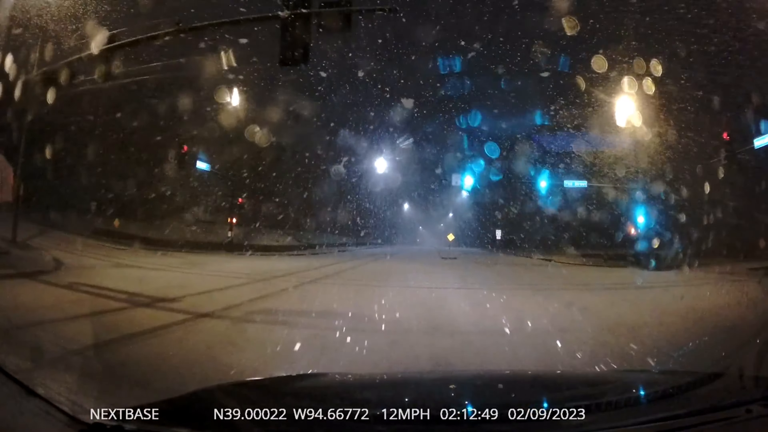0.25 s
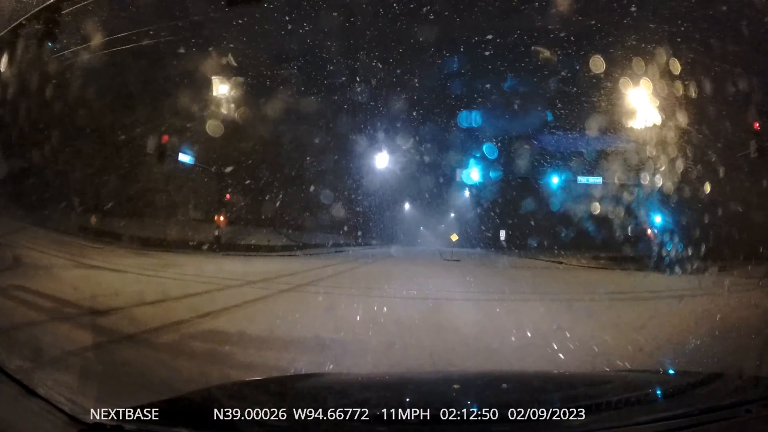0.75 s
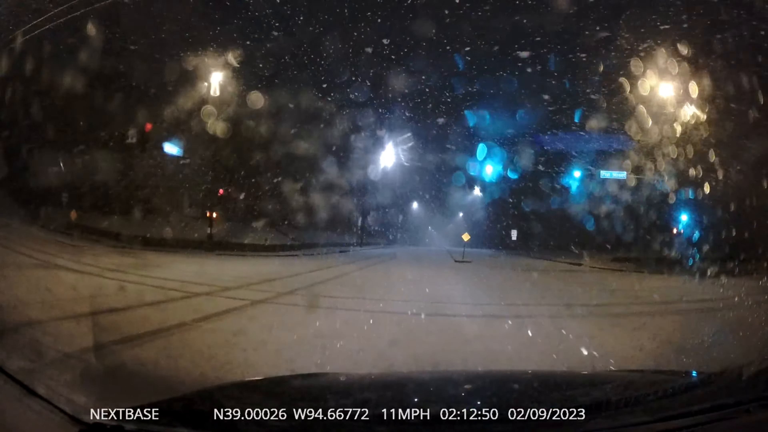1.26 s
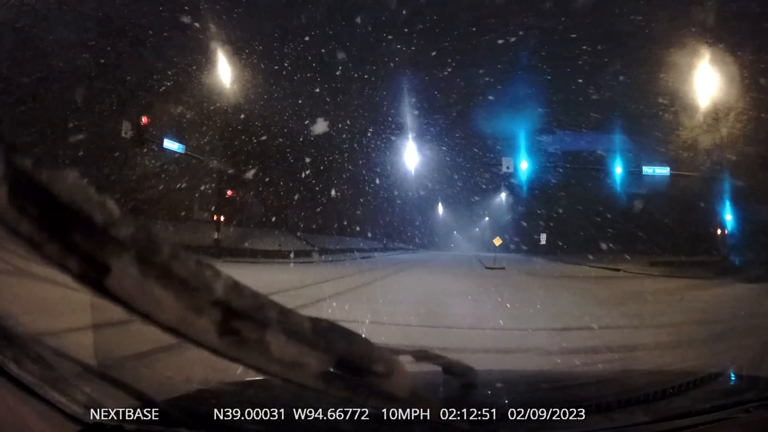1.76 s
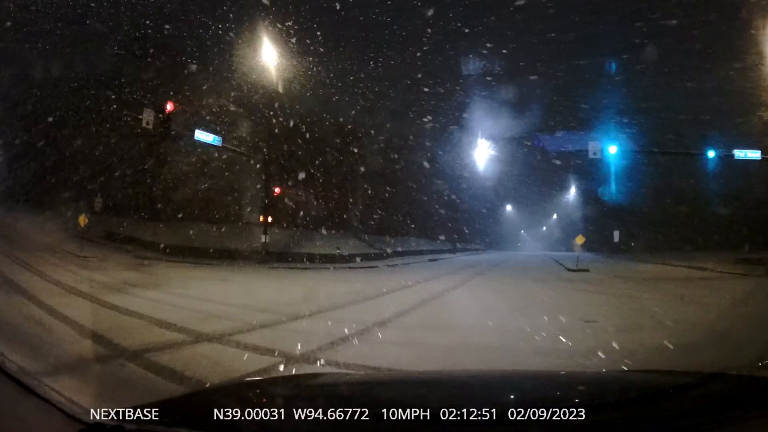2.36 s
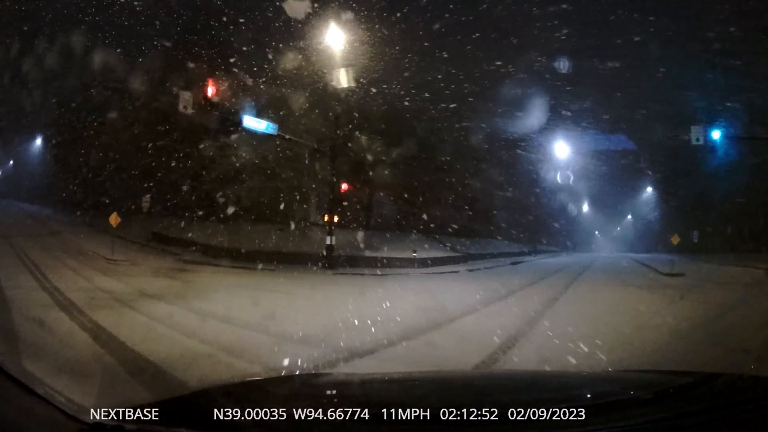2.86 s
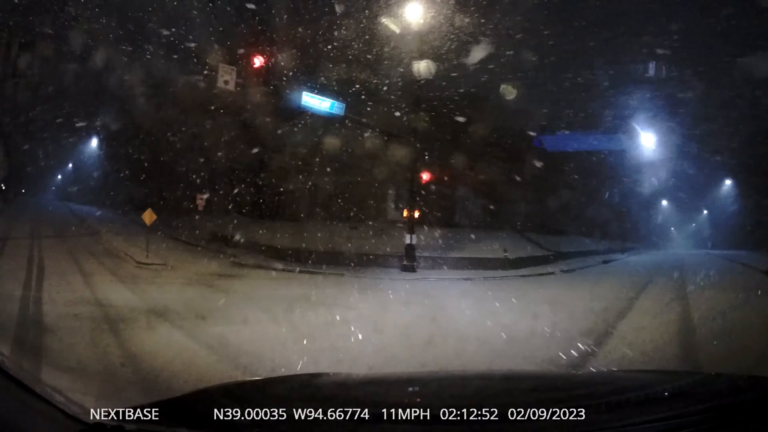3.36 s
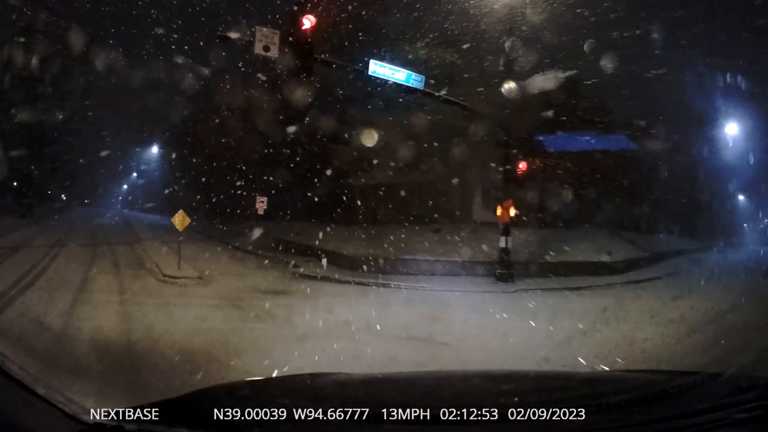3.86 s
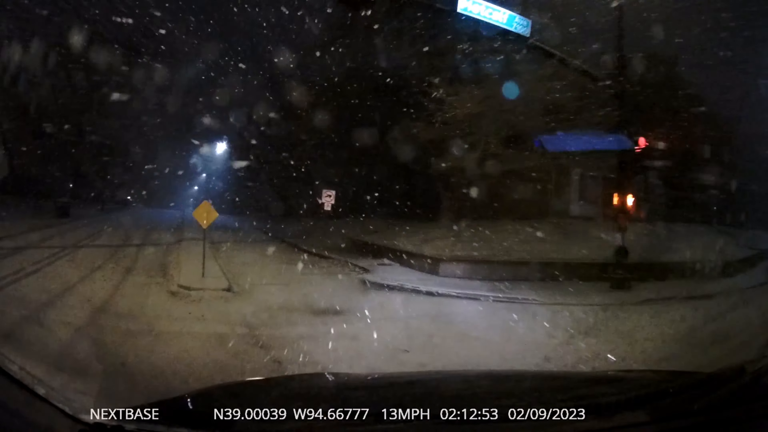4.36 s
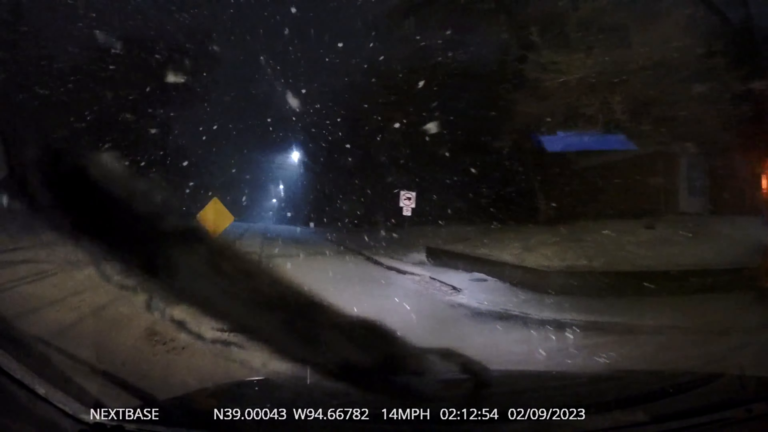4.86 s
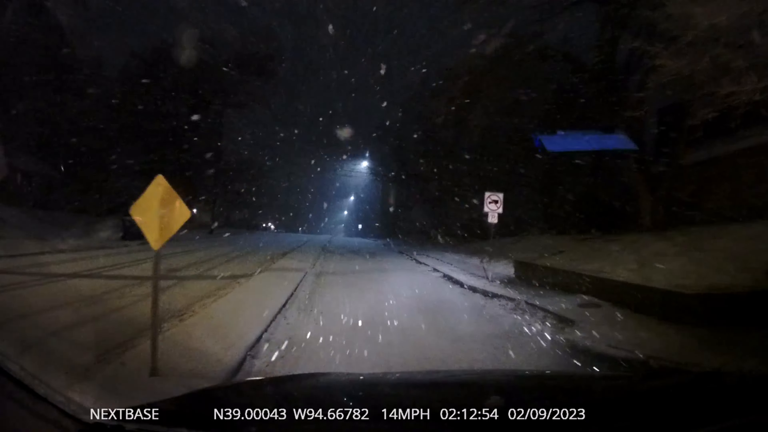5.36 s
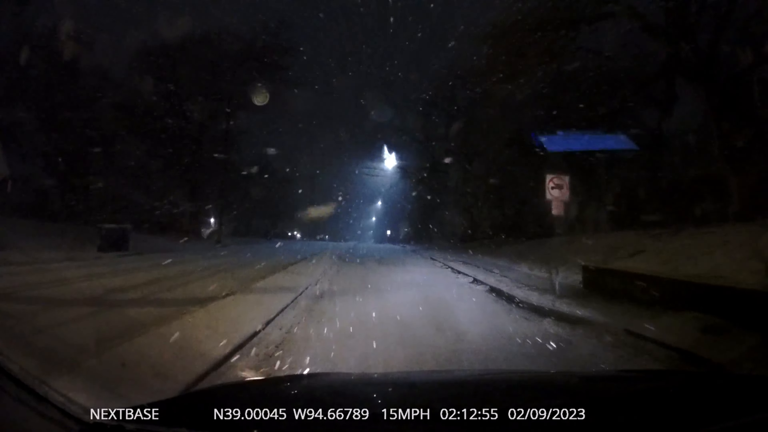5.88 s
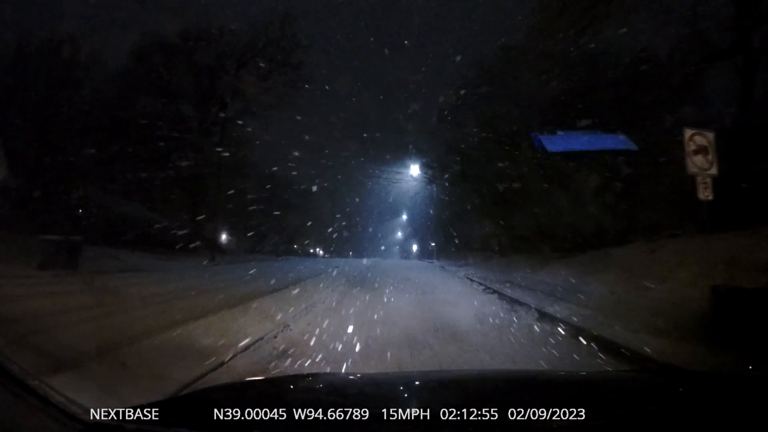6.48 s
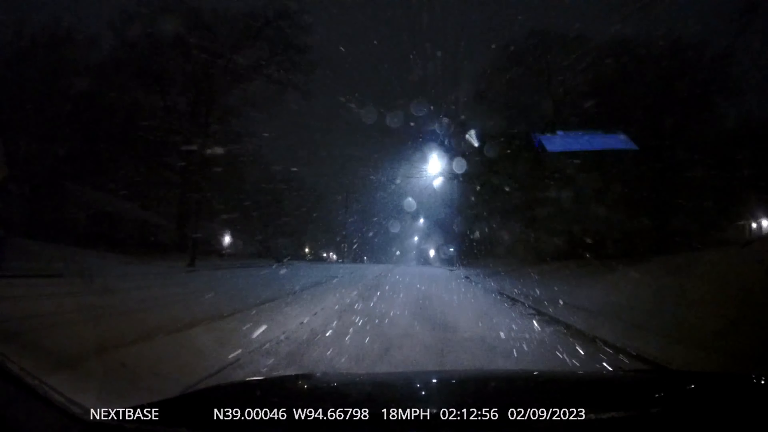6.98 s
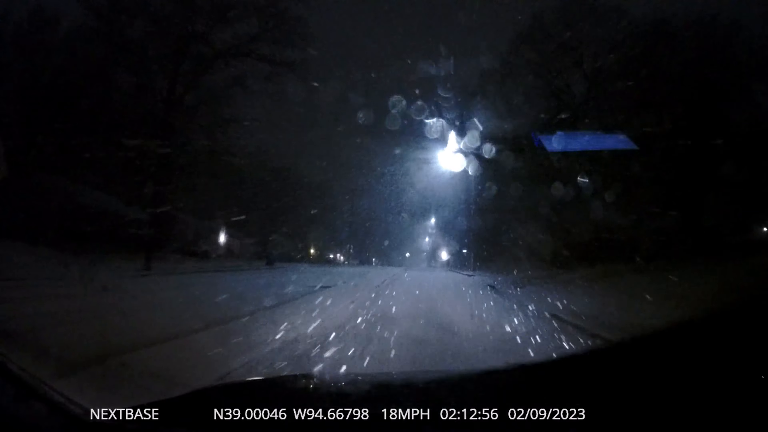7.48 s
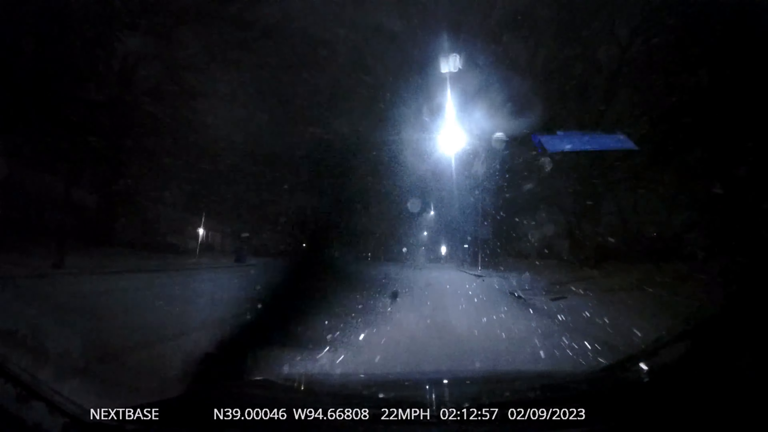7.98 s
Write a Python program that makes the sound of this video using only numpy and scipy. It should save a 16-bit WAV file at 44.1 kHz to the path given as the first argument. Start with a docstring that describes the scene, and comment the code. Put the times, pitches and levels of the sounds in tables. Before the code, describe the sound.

Dry, close car interior, slightly dull in the treble. From 0 s a low rumble, cabin boom and soft snowy tyre noise surround a low engine hum. An indicator relay clicks softly throughout, roughly every 0.34 s, alternating in tone. Faint sleet ticks on the glass. Small dull knocks come at 0.5, 0.8, 1.3 and 1.6 s; wiper swishes swell near 1.9 and 2.3 s, with a firm knock at 2.1. The engine pulls more strongly from about 2.6 s; a loud thump with a short rattle hits at 3.1. It eases near 5 s, when a deep rut rumble, thump, pellets and brief swish cluster around 5.1-5.3. A plastic clack lands at 5.75. From 5.7 s the engine climbs steadily, louder and growling, as tyre roar and wet hiss grow. A sharp, buzzing clatter runs 7.2-7.35, a short swish comes at 7.75, then heavy low thuds from 7.9 to 8.2.

```python
"""Car cabin on a snowy street

The car turns a corner and then speeds up. Noise bands make the tyres and wet snow, and sines make the
engine hum that climbs with its speed. Short decaying rings make the indicator relay, the sleet on the
glass, the thumps, and the loose things that knock and rattle. Wipers and slush are swelling noise,
with grains of ice crackling in it."""
import sys
import numpy as np
from scipy import signal
from scipy.fft import rfft, irfft, next_fast_len
from scipy.io import wavfile
from scipy.ndimage import uniform_filter1d

SR = 44100
rng = np.random.default_rng(int(sys.argv[2]) if len(sys.argv) > 2 else 0)


def inscribe(sig):
    """Save sig as 16-bit PCM at rate SR to the path in sys.argv[1].

    A 1-D sig is mono; a 2-D sig holds one channel per row.
    Samples are clipped to [-1, 1] before scaling.
    """
    pcm = np.round(np.clip(np.atleast_2d(sig).T, -1, 1) * 32767)
    wavfile.write(sys.argv[1], SR, pcm.astype(np.int16))


N = 362943
TIME = np.arange(N) / SR  # seconds

# Colours of the road noise, before it is set to its loudness: pitch_hz [Hz], level_db [dB]
RUMBLE_COLOUR = [(12, -14.5), (26, -6), (50, 2), (80, -5.5), (130, -7.5), (180, -15.5), (300, -38)]
BOOM_COLOUR = [(25, -13.5), (50, -3), (75, 8.5), (100, 0.5), (130, -3), (160, -6.5), (220, -30), (400, -44)]
TYRE_COLOUR = [(100, 4), (140, 0.5), (185, -12.5), (320, -10.5), (375, -12.5), (450, -14), (600, -18),
               (830, -21.5), (1050, -26.5), (1620, -34.5), (2810, -37.5), (3500, -45), (6700, -67),
               (9000, -49)]
# Tyre roar, growing with road speed: time_s [s], level_db [dB]
TYRE_ROAR = [(0, -41.5), (1.1, -40.5), (1.35, -39), (2.8, -37.5), (4.7, -36.5), (7.1, -30), (8.23, -28.5)]
# Ruts that make the body heave: peak_s [s], peak_db [dB], rise_s [s], fade_s [s]
RUTS = [(1.35, -29, 0.1, 0.066), (2.1, -29, 0.28, 0.13), (5.18, -18.5, 0.32, 0.43),
        (5.801, -24, 0.21, 0.34), (7.48, -27, 0.058, 0.064), (8.03, -21.5, 0.19, 0.5)]
RUMBLE_DB, BOOM_DB = -32.5, -34  # steady shaking of the body, booming of the cabin air

# Colour of slush and wiper noise: pitch_hz [Hz], level_db [dB]
SWISH_COLOUR = [(500, 9), (1200, 9.5), (2800, 9), (4200, 4.5), (6000, 5.5), (7200, 1.5), (9000, -17)]
# Swishes of slush and wiper blades: peak_s [s], peak_db [dB], rise_s [s], fade_s [s], brightest_hz [Hz]
SWISHES = [(0.46, -52, 0.15, 0.2, 3480), (1.918, -52.5, 0.13, 0.4, 2880), (2.321, -50, 0.13, 0.39, 4200),
           (5.295, -49, 0.042, 0.039, 5460), (7.75, -50, 0.083, 0.098, 5760)]
WET_HISS_DB, WET_HISS_PER_ROAR = -59.5, 0.44  # wet snow at average roar; dB gained per dB of roar
SWISH_RING_DB = 3.5
GRIT_DB, GRIT_SPREAD_DB = -2.5, 3.5  # ice grains: level against their swish, spread of sizes

# The stronger ice pellets on the glass: start_s [s], level_db [dB]
PELLETS = [(1.7669, -42), (1.941, -40), (2.146, -31.5), (2.2744, -44), (2.3506, -42), (2.6418, -42.5),
           (3.963, -42), (4.66, -43.5), (5.2126, -34), (5.2574, -38), (5.2754, -40), (5.5054, -41),
           (6.352, -37.5), (8.0212, -38)]
# Colour of a tap on the glass: pitch_hz [Hz], level_db [dB]
GLASS_COLOUR = [(600, -18), (1500, 1.5), (2800, 8.5), (4200, 2), (6000, -6), (7500, -10.5), (9000, 1)]
SLEET_DB, SLEET_SPREAD_DB = -56.5, 3  # the faint pellets: lowest level at average roar, spread of sizes

# Landings of a loose piece, in two rattling runs:
# start_s [s], level_db [dB], skid_s [s], decay_s [s], main_hz [Hz], main_ring_db [dB]
RATTLES = [(3.1176, -26, .009, 0.0069, 3190, 6.5), (3.1533, -32.5, 0.014, 0.0068, 3670, 3),
           (3.182, -37.5, 0.007, 0.014, 3650, 3), (7.22, -30, 0.014, .005, 3000, 10),
           (7.2317, -22.5, 0.0079, 0.0067, 2750, 2), (7.257, -21.5, 0.0047, .006, 2800, 9.5),
           (7.272, -30.5, 0.007, 0.0072, 6000, -5), (7.2811, -28, 0.004, 0.0053, 2900, 12),
           (7.303, -37.5, 0.0077, 0.005, 2900, 19), (7.34, -40.5, 0.0055, 0.0045, 2730, 28)]
# What the loose piece rings with: pitch_hz [Hz], level_db [dB]
LOOSE_MODES = [(1110, -11), (1600, -0.5), (2430, 4), (2750, -2), (3650, 5), (4050, 2), (4500, -1),
               (4880, -0.5), (5110, 1), (5830, -5), (6740, 1), (7360, -16)]
RATTLE_RISE_S, RATTLE_MODES_DB = 0.0011, -3.5  # attack; the piece's modes against its scrape
RATTLE_GRAIN_DB = 2  # unevenness of the chatter

# Single clacks of loose plastic: start_s [s], level_db [dB], decay_s [s], main_hz [Hz], main_ring_db [dB]
CLACKS = [(2.095, -31, 0.0051, 2300, 12), (2.258, -33.5, 0.008, 1800, 12), (5.066, -40, 0.0037, 2460, 19),
          (5.126, -29, 0.0065, 3320, 7), (5.379, -32.5, 0.0035, 1600, 25), (5.754, -25.5, 0.0097, 1920, 27),
          (5.771, -35, 0.0067, 3000, 12.5), (6.038, -30, 0.0044, 3020, 22), (7.202, -27, 0.0066, 3865, 10)]
# Colour of hard plastic: pitch_hz [Hz], level_db [dB]
PLASTIC_COLOUR = [(300, -21), (900, 1), (2500, -4), (4000, -1.5), (4700, -5), (7000, -6.5), (9000, -9.5)]
RATTLE_WIDTH, CLACK_WIDTH = 0.37, 0.6  # width of the main ring (octaves)
CLACK_RISE_S = 0.0011

# Dull blows of the wipers and of things in the cabin: start_s [s], level_db [dB], decay_s [s], main_hz [Hz]
THUMPS = [(0.033, -32, 0.0021, 895), (0.456, -23.5, 0.016, 120), (0.459, -28, 0.016, 370),
          (0.779, -29, 0.009, 260), (1.211, -34, 0.032, 130), (1.302, -28.5, 0.018, 150),
          (1.590, -27.5, 0.0092, 308), (2.083, -22.5, 0.015, 284.6), (2.093, -17, 0.011, 845),
          (2.115, -33, .01, 420), (3.119, -19, 0.019, 790), (3.123, -11.5, 0.014, 450),
          (4.411, -30, 0.0086, 550), (5.142, -17.5, 0.03, 284), (5.162, -24.5, 0.0074, 850),
          (5.203, -26, 0.0061, 590), (5.772, -27.5, 0.022, 700), (6.04, -29, 0.013, 316),
          (7.039, -27, 0.0058, 504), (7.234, -15.5, 0.0085, 927), (7.24, -22.5, 0.0056, 447),
          (7.26, -18.5, 0.021, 1010), (7.283, -22.5, 0.0081, 450), (7.304, -23.5, 0.011, 595),
          (7.931, -20.5, 0.035, 343), (8.001, -14, 0.019, 120), (8.016, -24.5, 0.025, 630.4),
          (8.108, -20.5, 0.0086, 400), (8.207, -14.5, 0.015, 120)]
# Colour of the crunch in a blow: pitch_hz [Hz], level_db [dB]
CRUNCH_COLOUR = [(100, -16), (280, 5.5), (740, -5.5), (1400, -9), (2500, -17.5), (4500, -30.5),
                 (8000, -57.5)]
# Dashboard and trim panels: pitch_hz [Hz], level_db [dB]
PANEL_MODES = [(118, 0.5), (175, -3.5), (245, -1.5), (285, 3.5), (335, -2.5), (432, -4.5), (485, -5),
               (565, -4.5), (640, -4), (745, -9), (828, -10), (912, -11), (1070, -12.5), (1260, -15)]

# Indicator relay, opening and closing in turn: start_s [s], level_db [dB before the gains of its two parts]
TICKS = [(0.1895, -38.5), (0.5187, -36), (0.8584, -40), (1.1982, -35.5), (1.5369, -39), (1.8891, -35.5),
         (2.2164, -40.5), (2.5571, -35), (2.8963, -39.5), (3.2365, -37.5), (3.5862, -39), (3.9155, -35),
         (4.2522, -40), (4.596, -36.5), (4.9342, -40.5), (5.2839, -35), (5.6111, -38), (5.9539, -37),
         (6.2931, -39), (6.6323, -36.5), (6.981, -41), (7.312, -33)]
# Ringing of the relay housing: pitch_hz [Hz], opening_db [dB], closing_db [dB]
RELAY_MODES = [(1377, -5.5, -7), (1473, 3, 9.5), (1526, 0.5, 5.5), (1606, -1.5, 1), (1751, -4.5, 7),
               (1802, 0.5, -1), (2053, -8.5, -2.5), (2156, -1.5, -9.5), (2220, -1.5, 0.5), (2756, -1, -5),
               (2920, -5.5, 4), (3180, -10, -6)]
# Colour of the snap of the relay's armature: pitch_hz [Hz], level_db [dB]
SNAP_COLOUR = [(1000, -10.5), (1500, 1.5), (2500, -10.5), (2900, 6.5), (3300, -8.5), (3700, -24)]
TICK_COLOUR_DB = 4  # how much each mode varies from tick to tick

# Engine speed: time_s [s], firing_hz [Hz]
REVS = [(0.0, 59.04), (0.68, 57.5), (0.98, 61.1), (1.51, 52.1), (1.79, 59.3), (2.2, 48.9), (2.43, 48.7),
        (2.66, 53.47), (4.56, 58.83), (5.06, 50.3), (5.3, 50.04), (5.5, 56.86), (5.68, 59.73), (5.96, 61.4),
        (6.08, 69.8), (6.25, 74.93), (6.63, 81.5), (6.78, 82.44), (7.49, 92.96), (8.07, 92.1), (8.16, 100)]
# Accelerator: coasting, a dab, half open through the turn, then wide open: time_s [s], load_db [dB]
THROTTLE = [(0, -14), (1.05, -25.5), (1.3, -2.5), (1.85, 0), (2.35, -16), (2.65, 2.5), (3.5, -4), (4.5, -3),
            (4.7, -11.5), (5.65, 0.5), (7.4, 3.5), (8.23, -1)]
# Cabin standing waves that the firing tone and its octave boom through: pitch_hz [Hz], level_db [dB at 0 dB load]
CABIN_BOOM = [(54, -39.5), (61, -25.5), (76, -20), (83, -28.5), (90, -22), (94, -36), (108, -30.5),
              (119, -24.5), (128, -26), (164, -37), (172, -28.5), (186, -45.5)]
# Engine overtones: multiple [times the firing rate], level_db [dB]
OVERTONES = [(3, 0), (4, 0.5), (5, -1), (6, -4), (7, -5), (8, -5.5), (9, -7.5), (10, -3.5), (12, -16),
             (14, -4)]
# How strongly the cabin carries an overtone: pitch_hz [Hz], gain_db [dB]
CABIN_GAIN = [(160, -13.5), (190, -16), (218, -6), (236, -14.5), (254, -6), (276, -15.5), (310, -9),
              (345, -11), (375, -4), (405, -9.5), (430, -13.5), (560, -13), (620, -21.5), (700, -12),
              (750, -18), (830, -15.5), (920, -28.5)]
# Overtones against the tyre roar; their rise with the firing rate and with load (dB per dB)
GROWL_DB, GROWL_DB_PER_HZ, GROWL_PER_LOAD = -1, 0.0227, 0.33

TOP_HZ = 7450  # where the treble starts to fall


def undb(db):
    """Turn decibels into a gain."""
    return 10 ** (np.asarray(db) / 20)


def unit(x):
    """Scale to an average strength (rms) of one."""
    return x / np.sqrt(np.mean(x ** 2))


def curve(table):
    """Join the (time, value) rows of a table into a curve over all samples."""
    return np.interp(TIME, *np.transpose(table))


def swell(s, rise, fade):
    """A gain that grows to one at time s and dies away again."""
    return np.exp(-np.maximum((s - TIME) / rise, (TIME - s) / fade))


def walk(rate):
    """A wandering level: random steps held 1 / rate seconds, smoothed twice and softly bounded; rms one."""
    hold = max(int(SR / rate), 1)
    steps = np.repeat(rng.standard_normal(N // hold + 1), hold)
    smooth = uniform_filter1d(uniform_filter1d(steps, hold), hold)[:N]
    return unit(np.tanh(unit(smooth) / 2))


def noise(points, size=N, ring_hz=1000, ring_db=0, ring_width=.2):
    """Noise of unit strength with a (Hz, dB) colour and one resonance (width in octaves)."""
    padded = next_fast_len(size, True)
    octave = np.log2(np.maximum(np.fft.rfftfreq(padded, 1 / SR), 1))
    hz, db = np.transpose(points)
    colour_db = np.interp(octave, np.log2(hz), db, left=-120, right=-120)
    colour_db = colour_db + ring_db * np.exp(-((octave - np.log2(ring_hz)) / ring_width) ** 2)
    spectrum = rfft(rng.standard_normal(padded)) * undb(colour_db)
    return unit(irfft(spectrum, padded)[:size])


def modes(hz, db, phases, size):
    """Sines of a struck object, slightly detuned at every blow."""
    detuned = hz * (1 + 0.0055 * rng.standard_normal(len(hz)))
    cycles = np.outer(detuned, TIME[:size]) + phases[:, None]
    return unit(undb(db) @ np.sin(2 * np.pi * cycles))


def burst(ring, rise, decay, hold=0):
    """A ring of unit level that builds up, holds while the contact lasts and then dies away."""
    t = TIME[:len(ring)]
    envelope = np.minimum(t / rise, 1) * np.exp(-np.maximum(t - rise - hold, 0) / decay)
    shaped = ring * envelope
    return shaped * np.sqrt(np.sum(envelope ** 2) / np.sum(shaped ** 2))


def add(out, s, sound):
    """Mix a sound in at time s."""
    i = int(np.clip(s * SR, 0, N - 1))
    out[i:i + len(sound)] += sound[:N - i]


def cabin(x, wet_db, decay, size=6000):
    """Close glass and soft seats give a short, dense tail."""
    t = TIME[:size]
    tail = rng.standard_normal(size) * np.exp(-t / decay) * (t > .003)
    tail = tail / np.linalg.norm(tail)
    return x + undb(wet_db) * signal.fftconvolve(x, tail)[:N]


def road(roar_db):
    """Ruts shake the body in lumps, the cabin air booms and tyres crunch on snow."""
    lumps = walk(9.9)
    power = undb(RUMBLE_DB) ** 2
    for s, db, rise, fade in RUTS:
        power = power + (undb(db) * swell(s, rise, fade)) ** 2
    rumble = noise(RUMBLE_COLOUR) * np.sqrt(power) * undb(1.5 * lumps)
    boom = noise(BOOM_COLOUR) * undb(BOOM_DB + 0.68 * lumps)
    crunch_db = 2.0 * lumps + 2.02 * walk(25) + 1.0 * walk(140)
    roar = noise(TYRE_COLOUR) * undb(roar_db + crunch_db)
    return rumble + boom + roar


def slush(roar_db):
    """Wet snow hisses more as the car gains speed; splashes and wiper strokes swell over it, finely grained."""
    out = noise(SWISH_COLOUR) * undb(WET_HISS_DB + WET_HISS_PER_ROAR * (roar_db - roar_db.mean()))
    for s, db, rise, fade, hz in SWISHES:
        swish = noise(SWISH_COLOUR, ring_hz=hz, ring_db=SWISH_RING_DB, ring_width=0.86)
        out = out + undb(db) * swell(s, rise, fade) * swish
    return out * undb(2.27 * walk(90))


def grit(count=40, size=1024):
    """Grains of ice crackle under the blades as short rings, scattered around the peak of each swish."""
    out = np.zeros(N)
    for s, db, rise, fade, _ in SWISHES:
        places = rng.uniform(-rise, fade, count)
        sizes_db = GRIT_SPREAD_DB * np.minimum(rng.exponential(size=count), 3.5)
        for place, grain_db in zip(places, sizes_db):
            hz = 1000 * 2 ** rng.uniform(0, 2.8)
            ring = noise(GLASS_COLOUR, size=size, ring_hz=hz, ring_db=5, ring_width=0.54)
            grain = burst(ring, rise=0.00071, decay=0.0014)
            add(out, s + place, undb(db + GRIT_DB + grain_db) * grain)
    return cabin(out, wet_db=-21.5, decay=.006)


def sleet(roar_db, count=420, size=1024):
    """Ice pellets tick on the glass, each with its own ring; the many faint ones hit harder at speed."""
    out = np.zeros(N)
    times = rng.uniform(0, N / SR, count)
    speed_db = WET_HISS_PER_ROAR * np.interp(times, TIME, roar_db - roar_db.mean())
    sizes_db = SLEET_SPREAD_DB * np.minimum(rng.exponential(size=count), 4.5)
    faint_db = SLEET_DB + speed_db + sizes_db
    for s, db in [*PELLETS, *zip(times, faint_db)]:
        hz = rng.uniform(2200, 6000)
        ring = noise(GLASS_COLOUR, size=size, ring_hz=hz, ring_db=5.5, ring_width=0.99)
        add(out, s - .001, undb(db) * burst(ring, rise=0.00076, decay=0.0031))
    return cabin(out, wet_db=-10.0, decay=0.0049)


def rattles(size=8192):
    """A loose piece lands again and again, buzzing in its own modes as it skids."""
    out = np.zeros(N)
    hz, mode_db = np.transpose(LOOSE_MODES)
    for s, db, skid, decay, main_hz, ring_db in RATTLES:
        favoured_db = ring_db * np.exp(-(np.log2(hz / main_hz) / RATTLE_WIDTH) ** 2)
        ring = undb(RATTLE_MODES_DB) * modes(hz, mode_db + favoured_db, rng.random(len(hz)), size)
        scrape = noise(PLASTIC_COLOUR, size=size, ring_hz=main_hz, ring_db=ring_db, ring_width=RATTLE_WIDTH)
        chatter = undb(RATTLE_GRAIN_DB * walk(450)[:size])
        landing = burst((ring + scrape) * chatter, rise=RATTLE_RISE_S, decay=decay, hold=skid)
        add(out, s, undb(db) * landing)
    return cabin(out, wet_db=-17, decay=0.007)


def clacks(size=8192):
    """Hard plastic pieces hit and chatter, each with its own ring."""
    out = np.zeros(N)
    for s, db, decay, hz, ring_db in CLACKS:
        ring = noise(PLASTIC_COLOUR, size=size, ring_hz=hz, ring_db=ring_db, ring_width=CLACK_WIDTH)
        add(out, s, undb(db) * burst(ring, rise=CLACK_RISE_S, decay=decay))
    chatter = undb(2.0 * walk(500))
    return cabin(out * chatter, wet_db=-13, decay=0.007)


def thumps(size=8192):
    """Soft heavy blows ring the panels briefly; those with a higher main ring add more crunch."""
    out = np.zeros(N)
    hz, mode_db = np.transpose(PANEL_MODES)
    for s, db, decay, main_hz in THUMPS:
        octaves_up = np.log2(hz / main_hz)
        favoured_db = 9 * np.exp(-(octaves_up / 0.32) ** 2)
        softness_db = 2.0 * np.maximum(octaves_up, 0)  # a long contact cannot drive the high modes
        crunch_db = -4 + 7 * np.log2(main_hz / 600)
        ring = modes(hz, mode_db + favoured_db - softness_db, rng.random(len(hz)), size)
        crunch = undb(crunch_db) * noise(CRUNCH_COLOUR, size=size)
        add(out, s - .002, undb(db) * burst(ring + crunch, rise=0.0028, decay=decay))
    return cabin(out, wet_db=-16.5, decay=0.0075)


def indicator(size=4096):
    """The relay's armature snaps and its housing rings on, with one set of modes to open and one to close."""
    out = np.zeros(N)
    hz, opening_db, closing_db = np.transpose(RELAY_MODES)
    phases = rng.random((2, len(hz)))
    for k, (s, db) in enumerate(TICKS):
        closing = k % 2
        mode_db = closing_db if closing else opening_db
        mode_db = mode_db + TICK_COLOUR_DB * rng.standard_normal(len(hz))
        snap = burst(noise(SNAP_COLOUR, size=size), rise=0.0035, decay=0.0054)
        ring = modes(hz, mode_db, phases[closing], size)
        housing = burst(ring, rise=0.0061, decay=0.0058, hold=.0015)
        add(out, s - .003, undb(db + 0.9) * snap + undb(db + 3.0) * housing)
    return cabin(out, wet_db=-13, decay=0.009)


def engine(roar_db):
    """Two booming firing tones, and overtones that swell as they climb through the cabin's resonances."""
    hz, load_db = curve(REVS), curve(THROTTLE)
    unsteady_hz = hz * (1 + 0.0015 * walk(14))
    phase = 2 * np.pi * np.cumsum(unsteady_hz) / SR
    hum = 0
    for multiple in (1, 2):  # the firing tone and its octave
        boom_db = np.interp(multiple * hz, *np.transpose(CABIN_BOOM))
        hum = hum + undb(load_db + boom_db) * np.sin(multiple * phase)
    hum = hum * undb(1.8 * walk(14))
    growl = 0
    for order in np.arange(8, 44) / 3:
        uneven_db = -5 if order % 1 else 0  # three unequal firings per crank turn fill in the thirds
        order_db = np.interp(order, *np.transpose(OVERTONES)) + uneven_db
        carried_db = np.interp(order * hz, *np.transpose(CABIN_GAIN))
        waver = undb(3.2 * walk(5) + 1.8 * walk(28))
        tone = np.sin(order * phase + rng.uniform(0, 2 * np.pi))
        growl = growl + undb(order_db + carried_db) * waver * tone
    effort_db = GROWL_DB_PER_HZ * (hz - hz.mean()) + GROWL_PER_LOAD * load_db
    return np.sqrt(2) * (hum + undb(roar_db + GROWL_DB + effort_db) * growl)


def scene():
    """Everything, as heard just behind the windscreen."""
    roar_db = curve(TYRE_ROAR)
    weather = slush(roar_db) + grit() + sleet(roar_db)
    loose_things = rattles() + clacks() + thumps()
    return (road(roar_db) + weather + loose_things + indicator() + engine(roar_db))[None]


def record(dry):
    """A small microphone with a narrow treble range: two low-pass filters, the second one steep."""
    soft = signal.sosfilt(signal.ellip(5, .4, 20, TOP_HZ, fs=SR, output="sos"), dry)
    return signal.sosfilt(signal.ellip(8, .2, 70, 8700, fs=SR, output="sos"), soft)


dry = scene()
out = record(dry)
inscribe(out)
```